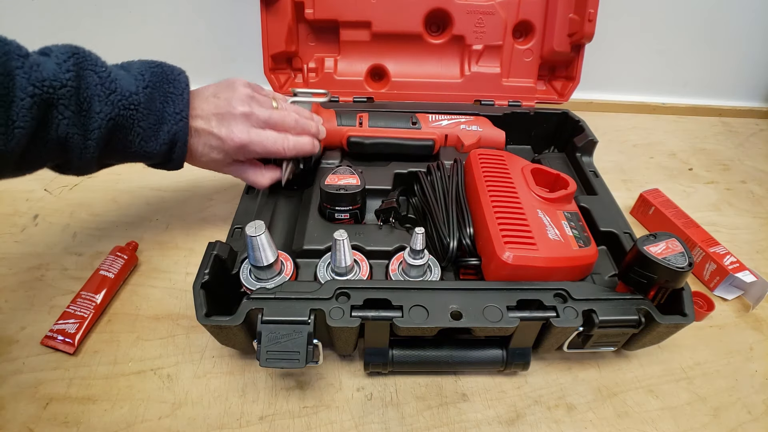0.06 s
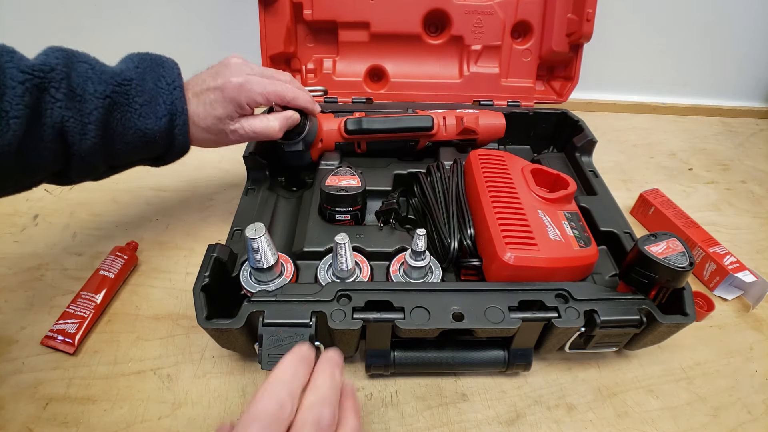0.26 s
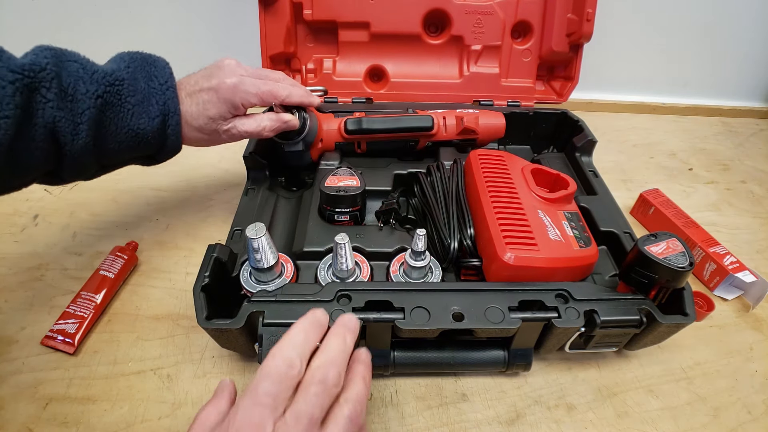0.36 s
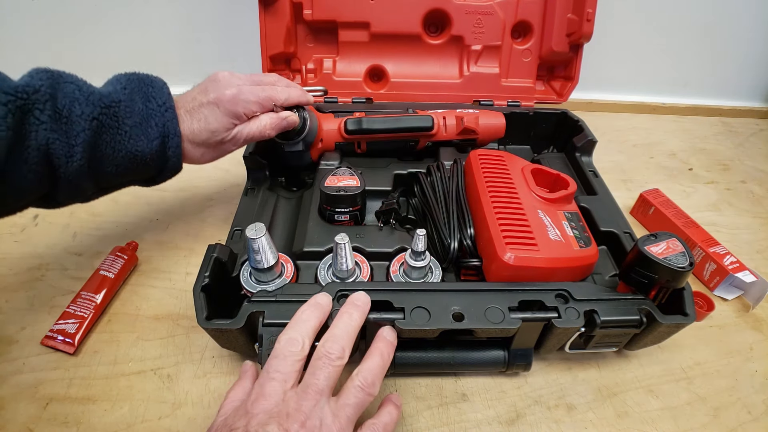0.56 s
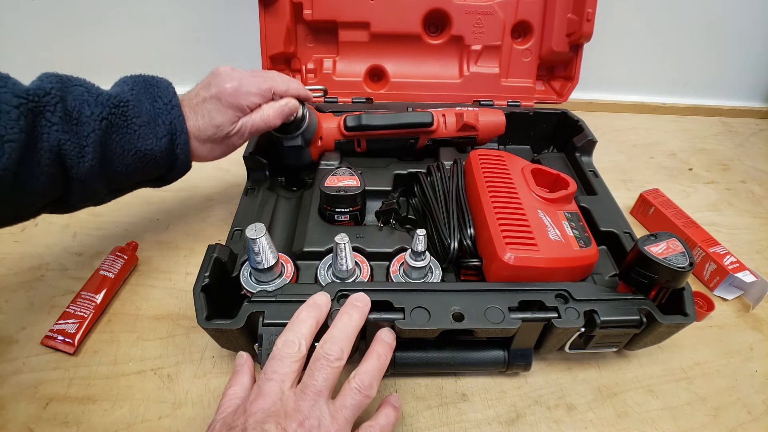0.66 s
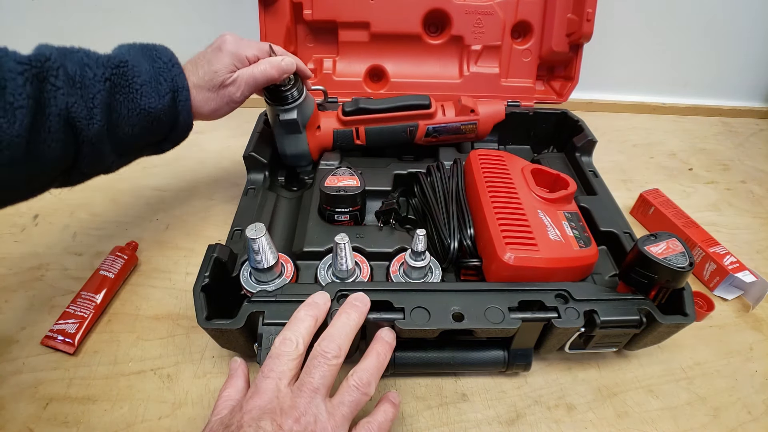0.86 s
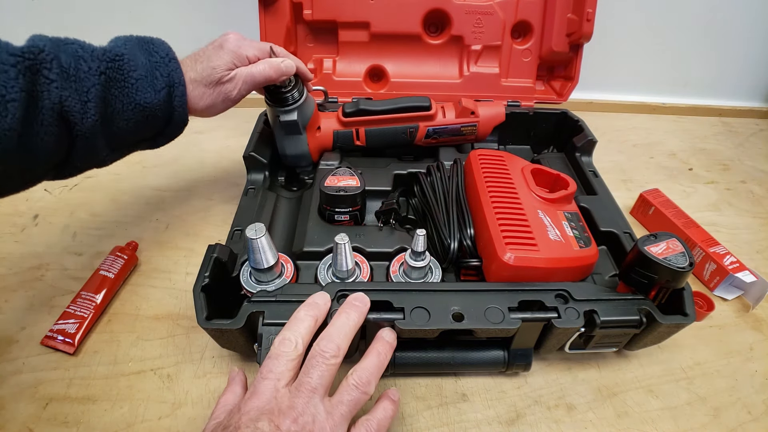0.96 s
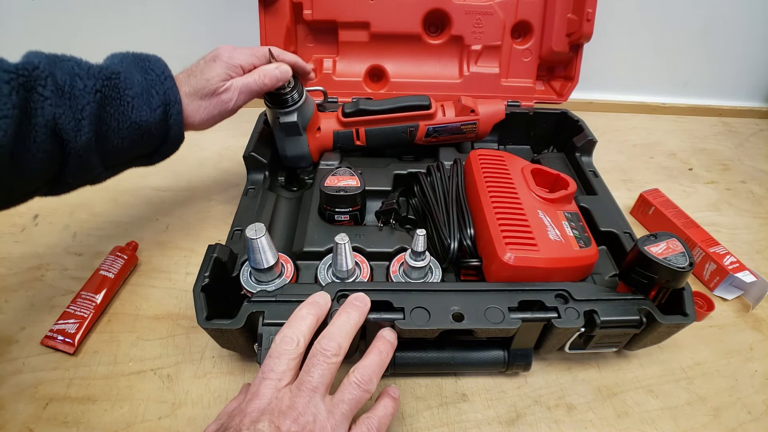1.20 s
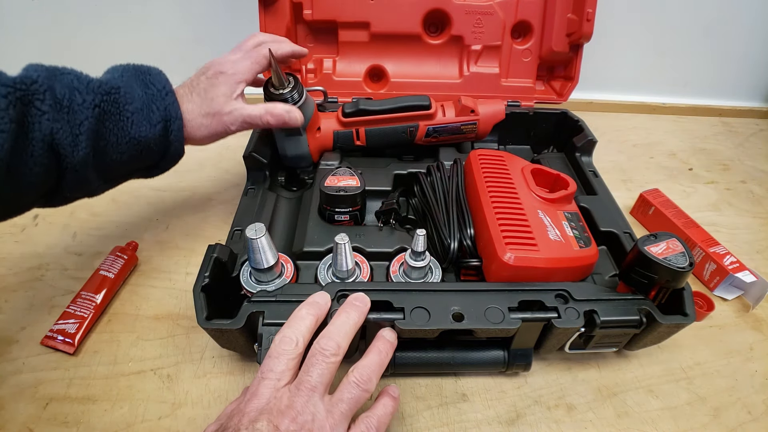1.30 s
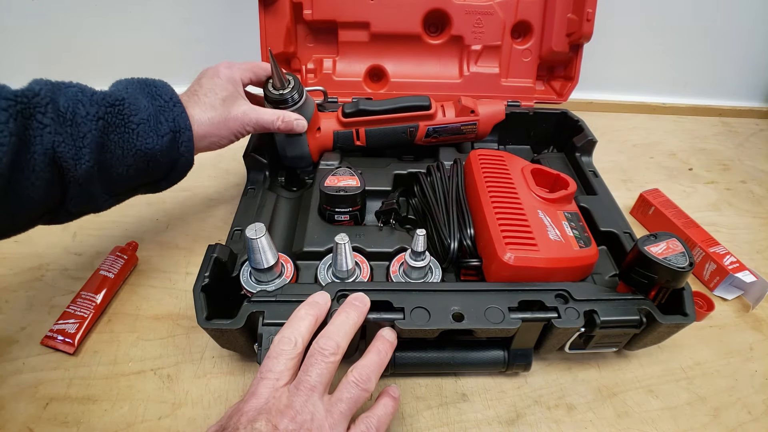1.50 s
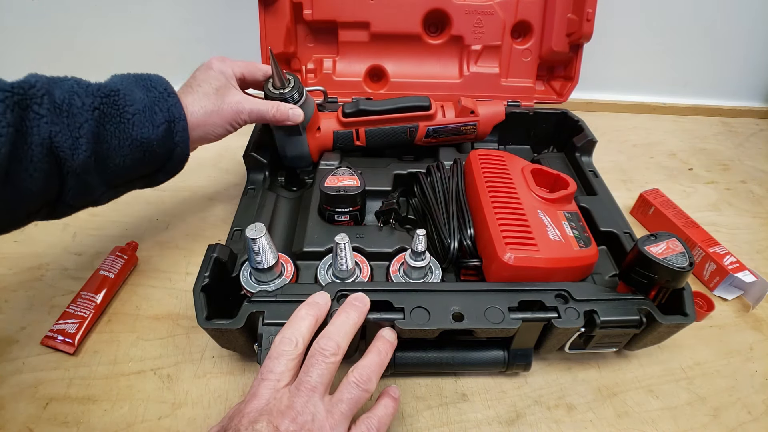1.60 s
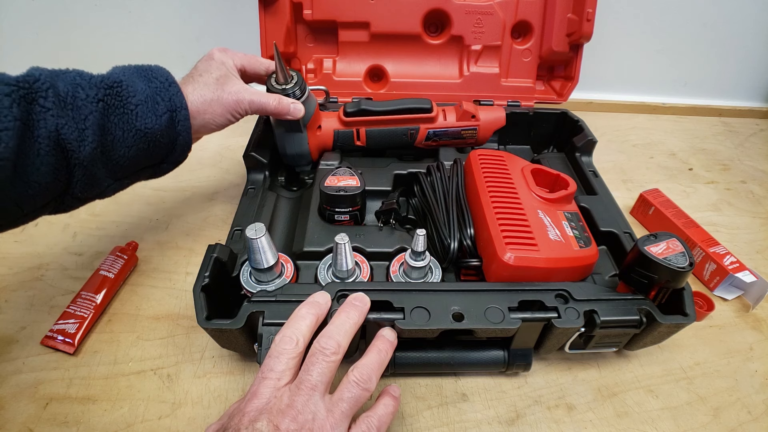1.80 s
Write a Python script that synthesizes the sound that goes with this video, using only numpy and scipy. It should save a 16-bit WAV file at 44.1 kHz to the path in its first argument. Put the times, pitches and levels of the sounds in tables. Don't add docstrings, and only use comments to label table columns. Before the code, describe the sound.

Hollow plastic knocks of a tool set into a molded case on a wooden bench

```python
import sys
import numpy as np
from scipy import signal
from scipy.fft import rfft, irfft, next_fast_len
from scipy.io import wavfile

SR = 44100
rng = np.random.default_rng(int(sys.argv[2]) if len(sys.argv) > 2 else 0)


def bounce(signal):
    frames = np.transpose(np.atleast_2d(signal))
    limited = np.clip(frames, -1, 1)
    pcm = np.round(limited * 32767).astype(np.int16)
    wavfile.write(sys.argv[1], SR, pcm)


def boost(x):
    u = np.asarray(x, float) / 20
    return 10 ** u


N = 81585

# f/Hz, level/dB, t60/s
CASE = [(176, -2.5, 0.061), (251.5, -2.5, 0.19), (291, -6.5, 0.17), (295.4, -16.5, 0.46),
        (368.2, -1.5, 0.15), (420, -6.5, 0.083), (473, -10, 0.1), (687.4, -5, 0.055), (757, -16, 0.21),
        (857.5, -11, 0.07), (1000, -33.5, .08), (1179, -24.5, 0.15), (1400, -20.5, 0.035),
        (2000, -25.5, .05)]
# f/Hz, level/dB, t60/s
BENCH = [(49, -8.5, 0.25), (86.4, -6, 0.091), (120.3, 7.5, 0.15), (154, -2.5, 0.071)]


def at_hz(points, hz):
    p = np.array(points)
    return np.interp(np.log(np.maximum(hz, 1)), np.log(p[:, 0]), p[:, 1])


def rms_one(x):
    return x / np.sqrt(np.mean(x ** 2) + 1e-20)


def coloured(spectrum, alike):
    mid, side = rng.standard_normal(size=(2, N))
    alike = np.clip(alike, 0, 1)
    pair = np.sqrt(1 + alike) * mid + np.sqrt(1 - alike) * side * [[1], [-1]]
    hz = np.arange(N // 2 + 1) * SR / N
    return rms_one(irfft(rfft(pair) * boost(at_hz(spectrum, hz)), N))


def ring(x, hz, t60_s):
    r = boost(-60 / (t60_s * SR))
    w = 2 * np.pi * hz / SR
    return signal.lfilter([0, np.sin(w)], [1, -2 * r * np.cos(w), r * r], x + 1e-18)


def clicks(s, sizes):
    out = np.zeros(N)
    np.add.at(out, np.clip((s * SR).astype(int), 0, N - 1), sizes)
    return out


def fade(x, t60_s):
    return signal.lfilter([1], [1, -boost(-60 / (t60_s * SR))], x + 1e-18)


def shift(x, s):
    return np.interp(np.arange(N) - s * SR, np.arange(N), x)


def body(modes, s, db, spread_db):
    chance = rng.standard_normal((len(s), len(modes)))
    out = np.zeros(N)
    for k, (hz, level_db, t60_s) in enumerate(modes):
        strikes = clicks(s, boost(db + level_db + spread_db * chance[:, k]))
        out += ring(strikes, hz, t60_s) * (-1) ** k
    return out


def swells(events):
    split_hz = 1000
    out = np.zeros((2, N + SR))
    age_s = np.arange(SR // 5) / SR
    for start_s, level_db, pitch_hz, cycles in events:
        grown = age_s * pitch_hz / max(cycles, .2)
        swing = grown * np.exp(1 - grown) * np.sin(2 * np.pi * age_s * pitch_hz)
        out[int(pitch_hz > split_hz), int(start_s * SR):][:len(age_s)] -= boost(level_db) * swing
    return out[:, :N]


def air():
    # f/Hz, level/dB per Hz
    air_colour = [(20, -20), (60, 0), (200, -10), (600, -20), (1500, -24), (3000, -27), (7500, -34),
                  (16000, -56)]
    return boost(-77) * coloured(air_colour, alike=0.28)


def rubbing():
    # t/s, pressure/dB, sliding speed/dB
    rub_curve = [(0, -47, -62.5), (.12, -58, -70), (0.202, -36, -49.5), (.27, -30.5, -44.5),
                 (.36, -37.5, -55), (0.579, -61.5, -72), (0.699, -63.5, -79.5), (.8, -58, -76.5),
                 (0.899, -41, -56), (1.0, -52.5, -58), (1.15, -52.5, -63), (1.271, -55, -63),
                 (1.45, -75.5, -69), (1.63, -64, -70), (1.658, -43, -65), (1.74, -65, -76),
                 (1.79, -75.5, -86), (1.85, -53.5, -83)]
    # f/Hz, level/dB per Hz
    hiss_colour = [(600, -24.5), (1000, -9), (1800, 1), (3000, -1), (7000, -9.5), (8500, -17.5),
                   (12000, -18), (16000, -33.5)]
    slips_per_s, slip_db = 360, 0
    walls_db, bench_db, hiss_db = -1.5, -5.5, -3.5
    s, *curves = np.transpose(rub_curve)
    pressure, speed = (boost(np.interp(np.arange(N) / SR, s, db)) for db in curves)
    sizes = boost(slip_db * np.minimum(rng.exponential(size=N), 5)) * rng.choice([-1, 1], size=N)
    slips = sizes * (rng.random(N) < slips_per_s / SR)

    def excite(modes):
        return rms_one(sum(boost(0.85 * db) * ring(slips, hz, t60_s * 0.83) for hz, db, t60_s in modes))

    rub = pressure * (boost(walls_db) * excite(CASE) + boost(bench_db) * excite(BENCH))
    hiss = speed * boost(hiss_db) * coloured(hiss_colour, alike=0.033)
    return rub, hiss


def cracks():
    # t/s, slap level/dB, snap level/dB, tick level/dB
    edge_hits = [(0, -61, -77, -65.5), (0.058, -57.5, -79.5, -98), (0.1714, -48, -67.5, -67.5),
                 (0.183, -51.5, -61, -65), (0.199, -44, -58, -64.5), (0.2069, -27, -41.5, -57),
                 (0.2157, -33.5, -40.5, -55), (0.222, -28, -44.5, -59), (0.2371, -29.5, -43.5, -49.5),
                 (.248, -17, -27, -33.5), (0.2591, -31, -34, -44.5), (0.272, -32, -41, -58.5),
                 (0.352, -47.5, -64, -80), (0.6188, -56, -61.5, -67), (0.633, -67.5, -66.5, -70),
                 (0.646, -59.5, -70, -71), (.832, -60.5, -80, -90), (0.844, -58, -69, -92),
                 (0.9102, -24, -32, -39.5), (0.943, -36.5, -51.5, -70), (1.091, -44.5, -50.5, -67),
                 (1.1882, -32, -54, -69.5), (1.6473, -45.5, -63.5, -72), (1.831, -75, -86.5, -91)]
    # f/Hz, level/dB per Hz
    slap_colour = [(300, -18.5), (550, 2.5), (800, -1), (1400, -8), (2100, -15.5), (3500, -28), (6000, -52)]
    snap_colour = [(1200, -23.5), (2700, 10), (4500, -0.5), (5500, -20.5), (8000, -26), (16000, -46)]
    tick_colour = [(3000, -22), (5200, 3.5), (7300, 1.5), (8500, -17), (10000, -13), (12000, -5.5),
                   (16000, -19.5)]
    rise_s, buzz_db, buzz_t60_s = 0.00014, -12.5, 0.13
    # colour, t60/s, likeness of the two channels
    kinds = (slap_colour, 0.067, 0.63), (snap_colour, 0.025, 0.067), (tick_colour, 0.022, 0.067)
    s, *levels = np.transpose(edge_hits)
    slow = np.exp(-1 / (rise_s * SR))
    out = []
    for db, (colour, t60_s, alike) in zip(levels, kinds):
        hits = signal.lfilter([1 - slow], [1, -slow], clicks(s, boost(db)) + 1e-18)
        envelope = fade(hits, t60_s) + boost(buzz_db) * fade(hits, buzz_t60_s)
        out.append(coloured(colour, alike) * envelope)
    slap, snap, tick = out
    return slap, snap + tick


def knocks():
    # t/s, knock level/dB, knock f/Hz, bench thud re knock/dB
    drop_hits = [(.001, -38.5, 110, -7), (.060, -34.5, 244, -17), (.082, -37, 257, -6.5),
                 (.080, -37, 130.5, -5.5), (.1745, -25.5, 259, -17.5), (.185, -41.5, 370, -22),
                 (.198, -15.5, 261, -7.5), (.2078, -10.5, 377, -9.5), (.207, -17.5, 78.5, -11),
                 (.219, -10, 258, -8.5), (.2335, -13.5, 169, 5.5), (.248, -3, 350, -15.5),
                 (.2528, -11, 196, -8.5), (.2615, -19, 335.4, -2.5), (.276, -12, 300, -8),
                 (.30, -39, 300, -20), (.328, -34, 300, -2.5), (.368, -29, 132.4, -2.5),
                 (.621, -39, 650, -21), (.633, -37, 249.5, -10.5), (.659, -48, 241.5, -10),
                 (.745, -52.5, 95.6, -6)]
    rock_hits = [(.8437, -46, 720, -0.5), (0.853, -38, 81.4, -20), (0.8759, -37, 165, -19),
                 (0.9096, -8.5, 335, -24), (0.92, -13.5, 110, -12), (0.9342, -13, 148, -5.5),
                 (0.943, -18, 351, -32.5), (1.004, -35.5, 115, -17), (1.091, -41, 347, 4.5),
                 (1.095, -37, 69, -4), (1.1875, -17, 259, -10), (1.199, -24, 122.5, 2.5),
                 (1.262, -39, 269, -18), (1.347, -59.5, 242, -3.5), (1.389, -59.5, 252, -14),
                 (1.648, -29.5, 345, -9), (1.66, -34, 110, -13), (1.701, -51, 149.3, -1),
                 (1.828, -49.5, 240, -11), (1.62, -58.5, 400, -8.5)]
    knock_cycles, knock_db = 0.78, -2
    case_db, case_spread_db, contact_hz = -15.5, 5.5, 1790
    wall_reach_hz = 300
    bench_db, bench_delay_s, bench_rise_s, bench_swell_hz = -13, 0.0028, 0.0099, 110
    s, db, hz, thud_db = np.vstack([drop_hits, rock_hits]).T

    knock = np.zeros(N + SR)
    age_s = np.arange(SR // 5) / SR
    for start_s, level_db, pitch_hz in zip(s, db, hz):
        turns = age_s * pitch_hz
        grown = turns / knock_cycles
        swing = grown * np.exp(1 - grown) * np.sin(2 * np.pi * turns)
        knock[int(start_s * SR):][:len(age_s)] -= boost(level_db + knock_db) * swing

    reach_db = 20 * np.log10(np.minimum(hz / wall_reach_hz, 1))
    soft_contact = signal.butter(1, contact_hz, fs=SR, output="sos")
    walls = signal.sosfilt(soft_contact, body(CASE, s, db + reach_db + case_db, case_spread_db))

    thud = body(BENCH, s + bench_delay_s, db + thud_db + bench_db, spread_db=3.5)
    push = np.hanning(int(2 * bench_rise_s * SR))
    carrier = np.cos(2 * np.pi * bench_swell_hz * np.arange(len(push)) / SR)
    swell = signal.fftconvolve(thud, push * carrier / push.sum() * 2)
    return knock[:N] + walls + swell[:N]


def taps():
    # t/s, level/dB, f/Hz, swell/cycles
    spot_hits = [(.1745, -35, 750, 2), (.2078, -39, 1130, 1.3), (.208, -38, 2630, 2.2),
                 (0.2145, -37, 3230, 2.1), (0.2224, -28, 1540, 1.5), (.237, -39, 6500, 3.2),
                 (.2486, -24, 540, 0.71), (0.2496, -24, 1260, 2.5), (0.2474, -25, 2650, 4.4),
                 (0.2602, -19, 1174, 2.3), (.262, -15, 185, 1.2), (0.282, -26.5, 188, 1.1),
                 (0.314, -40, 380, 3), (.345, -37, 370, 2.6), (.27, -38, 974, 2.5),
                 (0.6215, -53, 5000, 1.5), (0.635, -45, 230, 1.16), (.715, -68, 800, 6),
                 (.745, -61.5, 850, 5.8), (.79, -63, 757, 5.9), (.881, -39.5, 260, 0.38),
                 (0.8996, -47, 275, 1.6), (1.0922, -27.5, 344, 0.75), (1.1952, -32, 417, 1.3),
                 (1.203, -31, 245, 0.58), (1.221, -33, 250, 0.54), (.912, -30, 604, 2.6),
                 (1.654, -58, 1600, 2.1), (.621, -48.5, 858, 1.6), (.6225, -43, 234, 0.89),
                 (.652, -50, 800, 1.7), (0.9103, -22, 1500, 1.3), (.9098, -28.5, 3520, 2.3),
                 (0.9098, -38, 6620, 4), (.918, -31.5, 740, 3), (0.926, -25.5, 153, 0.5),
                 (.9435, -34.5, 800, 2.5), (1.091, -46.5, 2970, 3), (1.093, -43.5, 1600, 2.3),
                 (1.188, -43, 1445, 2.5), (1.188, -43.5, 2130, 2.2), (1.1883, -55.5, 4100, 3),
                 (1.6483, -45, 797, .8), (1.649, -53.5, 1550, 2.43), (1.6485, -62.5, 3240, 2.5),
                 (1.6492, -63.5, 6500, 3)]
    return swells(spot_hits)


def sways():
    # t/s, level/dB, f/Hz, swell/cycles
    weight_shifts = [
        (0.471, -48, 60.3, 0.93),
        (.67, -65, 60, 0.97),
        (.98, -40, 50.2, 0.8),
        (1.126, -46, 149, 1.6),
        (1.25, -53.5, 64.6, 1.4),
        (1.36, -61, 59.7, 1),
        (1.57, -61, 55, 0.99),
        (1.69, -55, 55.2, 0.99),
    ]
    return swells(weight_shifts)


def room(x):
    # f/Hz, t60/s
    room_decay = [(100, 0.3), (500, 0.47), (2000, 0.59), (6000, 0.078), (14000, 0.16)]
    shared_below_hz = 508.4
    size = next_fast_len(N + SR)
    hz = np.arange(size // 2 + 1) * SR / size
    lags_s = rng.uniform(.011, .04, size=(2, 10, 1))
    signs = rng.choice([-1, 1], size=(2, 10, 1))
    loop = boost(-60 * lags_s / at_hz(room_decay, hz)) * np.exp(-2j * np.pi * hz * lags_s)
    left, right = np.sum(loop / (1 - loop) * signs, axis=1)
    shared = 1 / (1 + (hz / shared_below_hz) ** 4)
    response = np.array([left, shared * left + (1 - shared) * right])
    return irfft(rfft(x, size) * response, size)[:, :N] / 3


def scene():
    left_db, left_slap_db, left_high_db = 4, 2, 5.5
    low_lag_s, slap_lag_s, high_lag_s = 0.00022, 0.00012, 0.0004
    room_db, room_high_db, room_tap_db = -12.5, -11.5, -8.5
    background = air()
    rub, hiss = rubbing()
    slap, snap = cracks()
    knock = knocks()
    tap_low, tap_high = taps() + sways()
    low = knock + rub + tap_low
    high = snap + hiss
    lean = np.array([[.5], [-.5]])

    near_low = np.array([shift(low, low_lag_s), low]) * boost(left_db * lean)
    near_slap = np.array([slap[0], shift(slap[1], slap_lag_s)]) * boost(left_slap_db * lean)
    near_high = np.array([high[0] + tap_high, shift(high[1] + tap_high, high_lag_s)])
    near_high = near_high * boost(left_high_db * lean)

    bright = high[0] + slap[0] + boost(room_tap_db) * tap_high
    wet = room(boost(room_db) * low + boost(room_high_db) * bright) * boost(left_db * lean)
    return near_low + near_slap + near_high + wet + background


def low_pass(x):
    return signal.sosfilt(signal.butter(12, 16460, fs=SR, output="sos"), x)


def record(dry):
    low_cut = signal.butter(4, 42, "high", fs=SR, output="sos")
    top_cut = signal.cheby2(10, 60, 16800, fs=SR, output="sos")
    x = signal.sosfilt(top_cut, signal.sosfilt(low_cut, dry))
    return low_pass(np.clip(x, -1, 1))


dry = scene()
out = record(dry)
bounce(out)
```